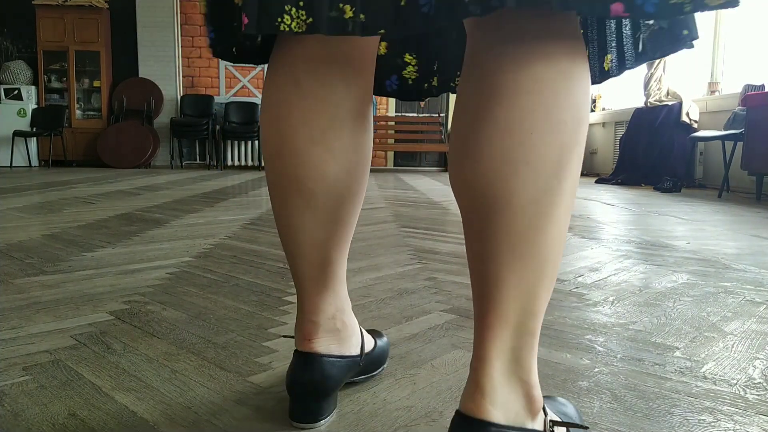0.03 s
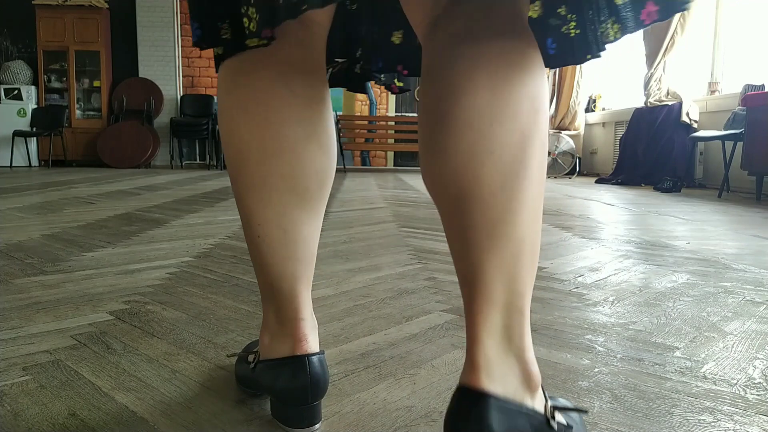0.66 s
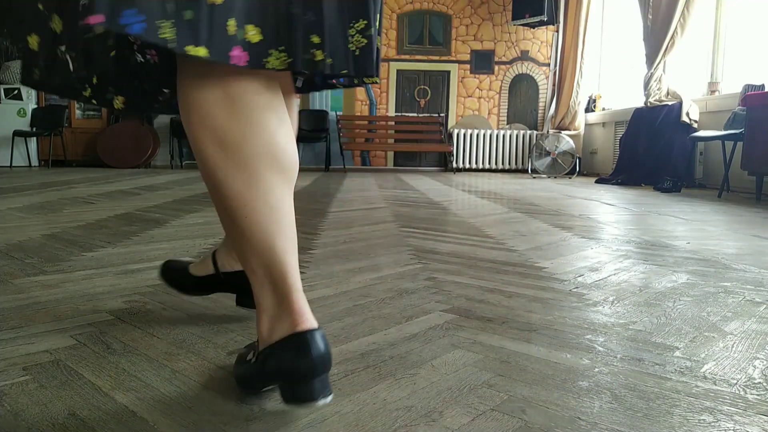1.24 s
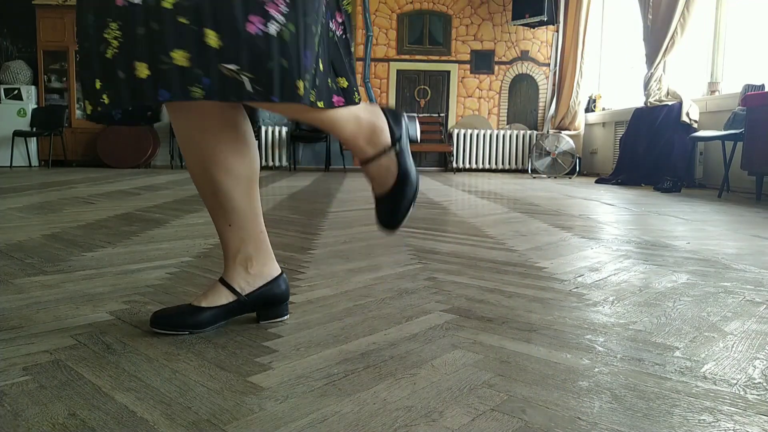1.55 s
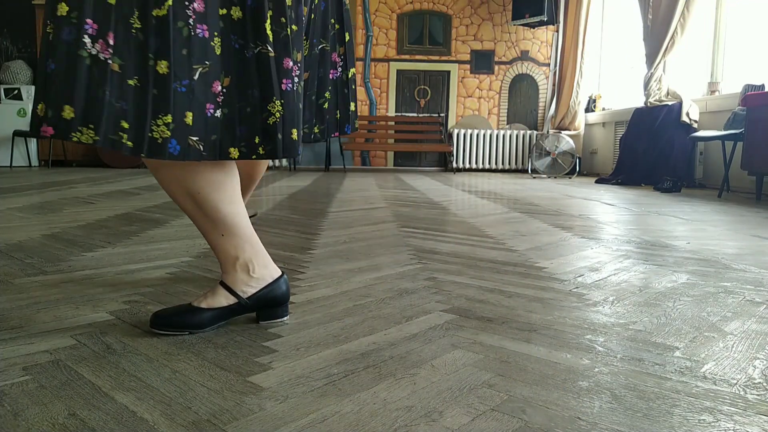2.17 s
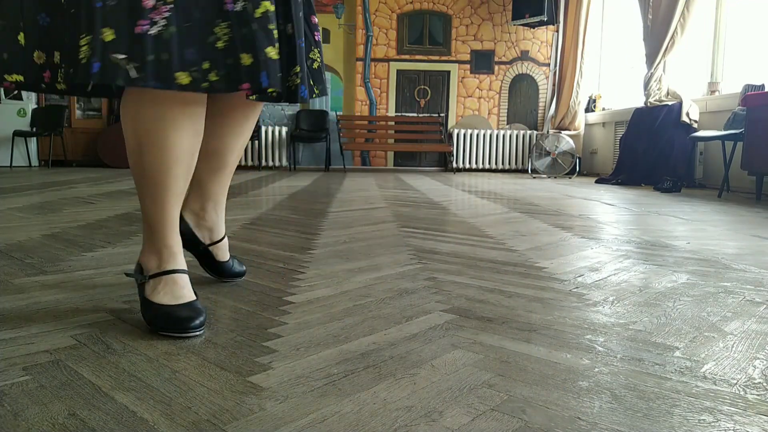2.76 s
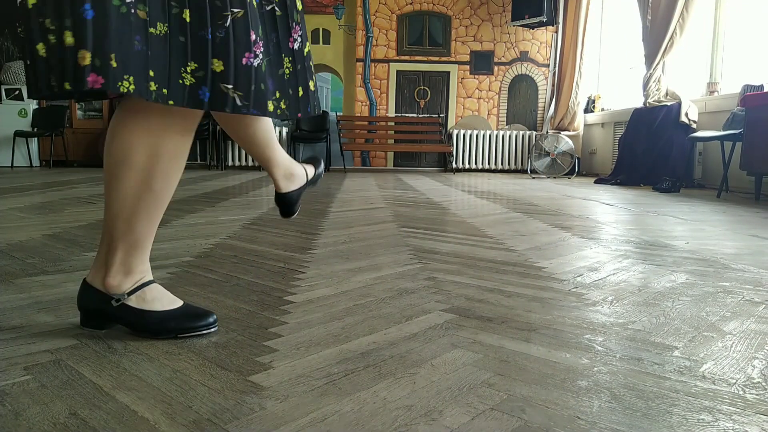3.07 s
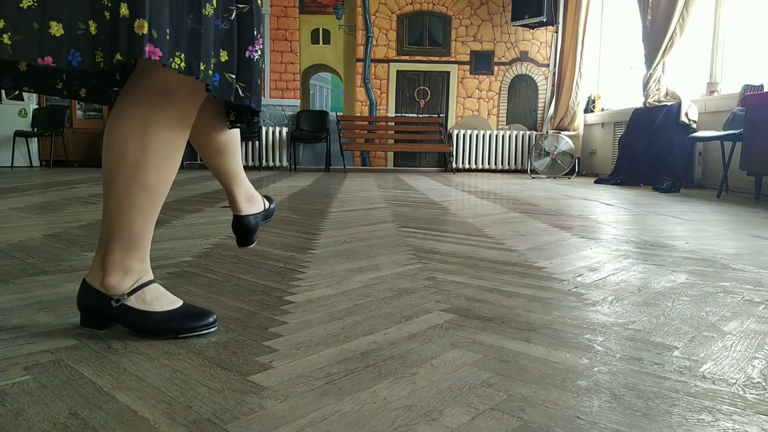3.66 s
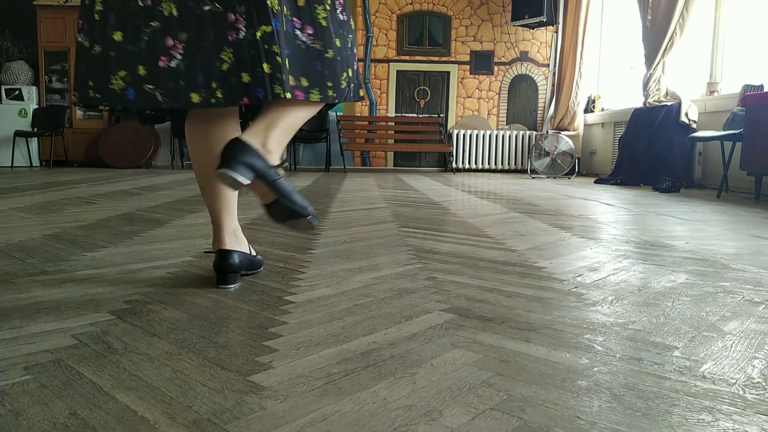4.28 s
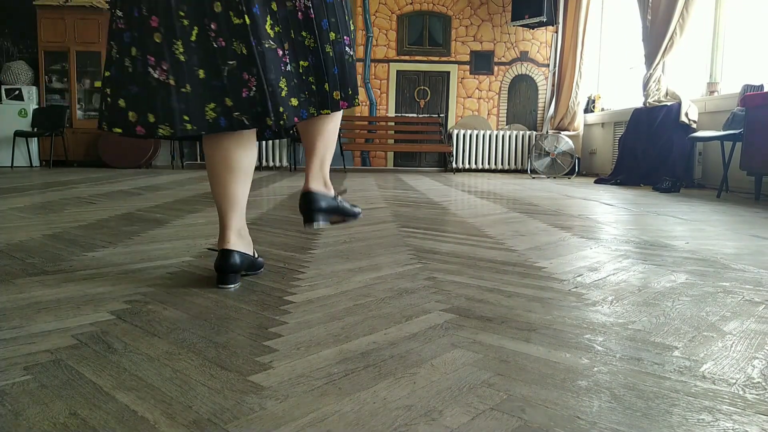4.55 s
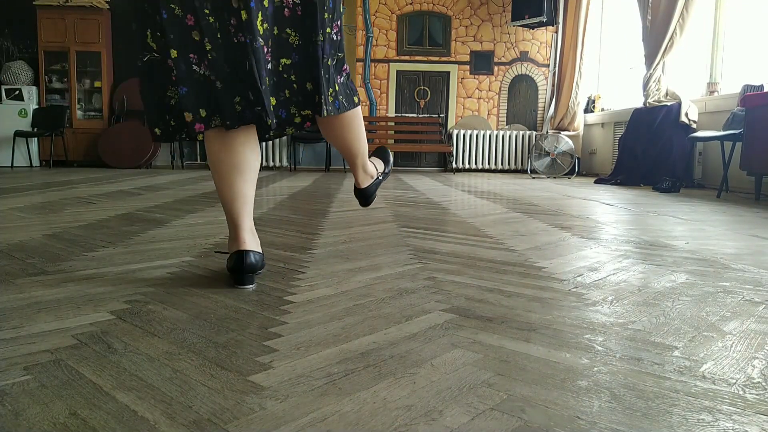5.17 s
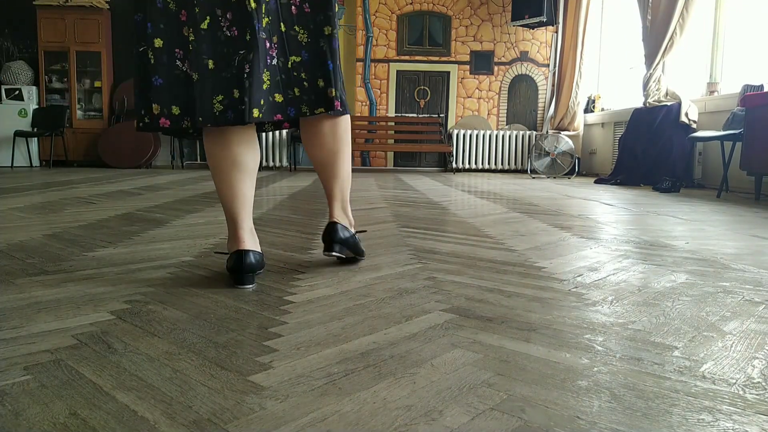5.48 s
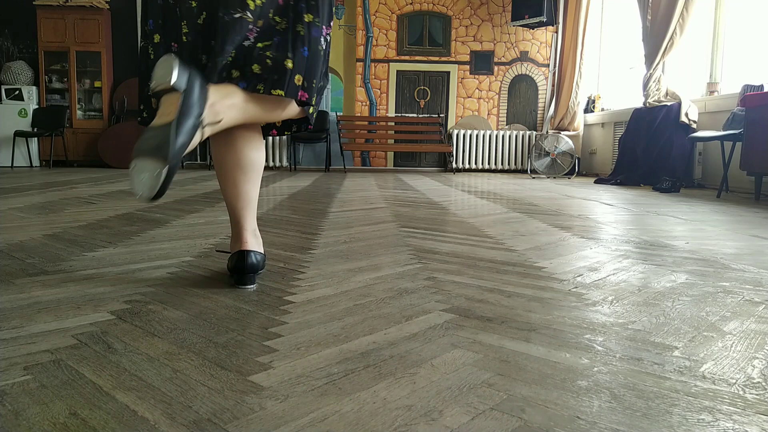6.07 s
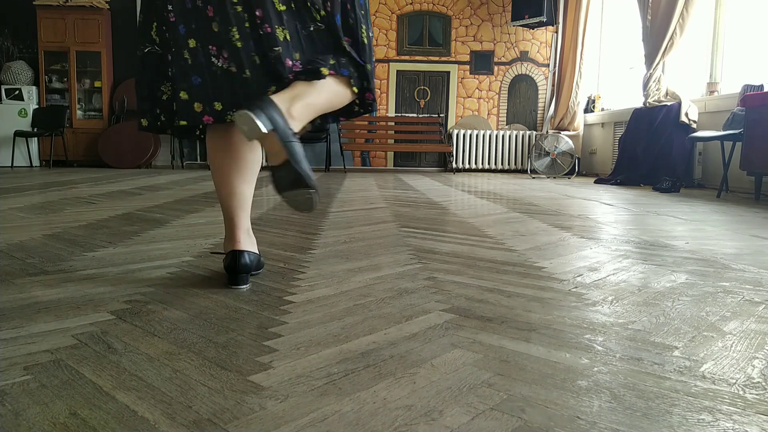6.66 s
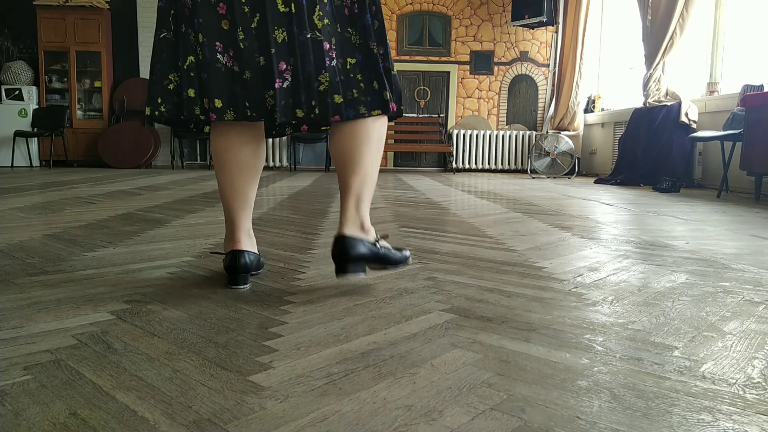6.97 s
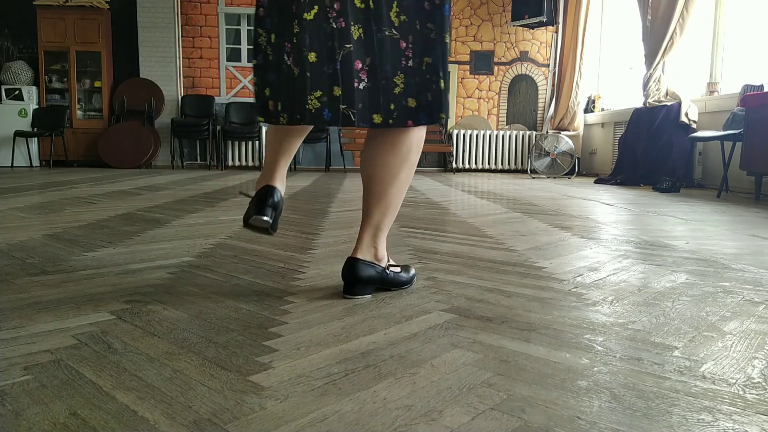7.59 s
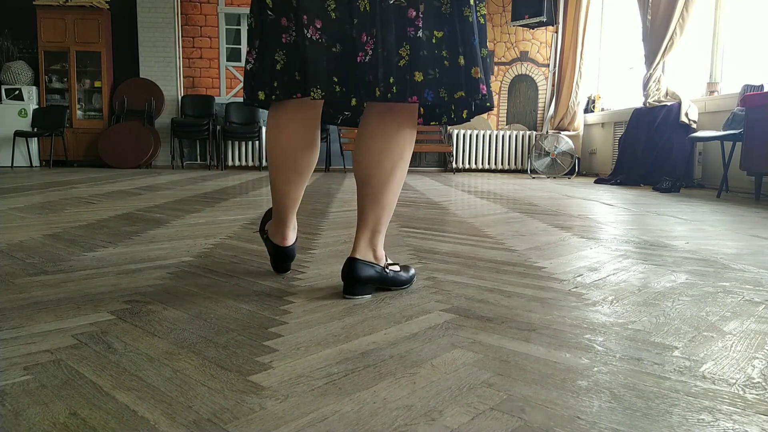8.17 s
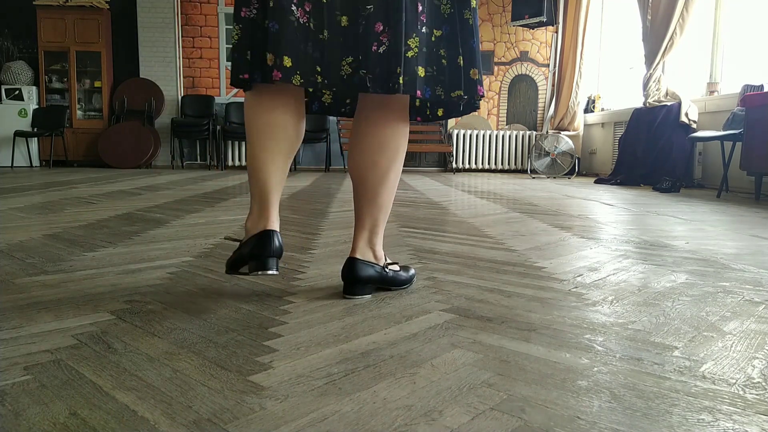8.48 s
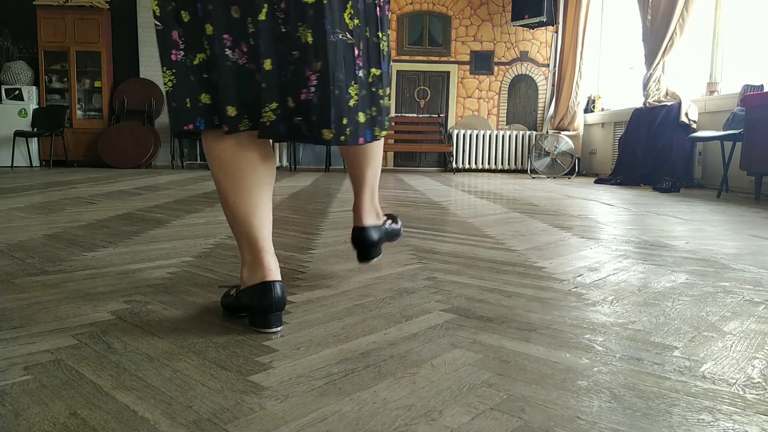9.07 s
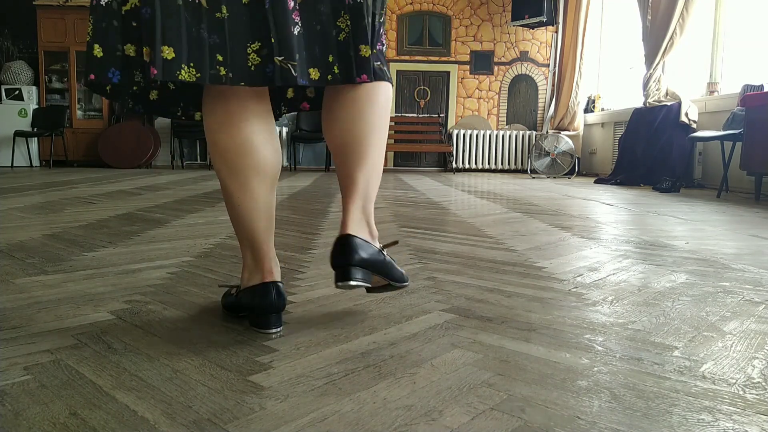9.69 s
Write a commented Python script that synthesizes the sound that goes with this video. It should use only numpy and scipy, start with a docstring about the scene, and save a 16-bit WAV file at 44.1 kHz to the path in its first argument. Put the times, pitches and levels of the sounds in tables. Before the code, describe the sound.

Tap shoes strike a wooden floor in a large echoing hall, five slow steps followed by steps at twice the pace.

```python
"""A tap dancer on the parquet of a large hall: five slow steps, then steps at twice the pace.
Metal plates crack, heel and sole knock, the sprung floor thuds; shoes tick and cloth swishes softly.
A pair of microphones 13 cm apart has the dancer ahead and to the right and a wall just behind it.
That wall, the ceiling and the hall answer over a distant motor's hum and the building's rumble and hiss.
The recorder's limiter holds down the cracks."""
import sys
import numpy as np
from scipy import signal
from scipy.fft import rfft, irfft, next_fast_len
from scipy.io import wavfile
from scipy.ndimage import uniform_filter1d, minimum_filter1d, map_coordinates

SR = 44100
rng = np.random.default_rng(int(sys.argv[2]) if len(sys.argv) > 2 else 0)


def waveform_to_disk(signal):
    """Save audio, clipped to [-1, 1], as 16-bit WAV at the path in sys.argv[1]."""
    frames = np.transpose(np.atleast_2d(signal))
    scaled = np.clip(frames, -1, 1) * 32767
    samples = np.round(scaled).astype(np.int16)
    wavfile.write(sys.argv[1], SR, samples)


N = 437913
SIZE = 65536  # samples for one contact and its reverberation
HZ = np.fft.rfftfreq(SIZE, 1 / SR) + 1e-3
T = np.arange(SIZE) / SR

# The distant motor. Each row: frequency in Hz, rms level in dB.
MOTOR_TONES = [(48.5, -53), (97, -72.5), (113, -62)]
# Room tone, low and high. Each row: frequency in Hz, relative spectral level in dB.
RUMBLE_SPECTRUM = [(15, -11), (38, -22.5), (50, 10), (63, 1.5), (88, -2.5), (130, -14), (160, -8),
                   (187, -2), (215, -6), (265, -23.5), (302, -13.5), (370, -32), (480, -38.5), (700, -76.5)]
HISS_SPECTRUM = [(300, -19.5), (450, -3.5), (750, -3), (1020, -3), (1600, -9.5), (2200, -9.5),
                 (5000, -15.5), (9500, -11), (15500, -20)]
# The hall's reverberation fading from an earlier step (two rows), then soft swishes of skirt and shoe.
# Each row: middle in seconds, half length in seconds, level in dB, centre in Hz.
SOFT_NOISES = [(0.015, 0.14, -60, 1790), (0.022, 0.079, -77, 4800), (.817, 0.018, -57.5, 1300),
               (1.383, 0.061, -57, 12200), (2.59, 0.18, -59, 12500), (2.93, 0.084, -71, 9100)]
# The shoes shifting. Each row: start in seconds, relative level in dB, wooden knock against the ring
# in dB, ring in Hz.
TICKS = [(.169, -45, -4, 11000), (.175, -30.5, -18, 2130), (.175, -32.5, -14, 5540), (.209, -48, -6, 1500),
         (.357, -50, -4, 8900), (.579, -57, 10, 900), (.590, -50.5, 5, 1390), (.662, -43.5, 5.5, 2410),
         (.684, -51, 0.5, 6000), (.776, -53, -11.5, 11000), (.786, -46, -14, 10000), (1.276, -56, -6, 1930),
         (1.394, -57, 5, 1500), (7.532, -28, -9.5, 3740)]
# Shoe meets floor. Each row: start in seconds, blow on the wood in dB, heel share (0 toe, 1 heel),
# floor boom in dB, blow on the plate in dB, edge share (0 flat, 1 on edge), plate pitch ratio;
# first resonance in Hz and signed dB added, second resonance in Hz and signed dB subtracted, board in Hz
# and its gain in dB, sole overtone in Hz and its gain in dB; bearing in degrees to the right,
# treble thrown at the microphones in dB, sound thrown at the ceiling in dB.
TAPS = [(1.447, 26.5, 0.47, 0, 16.5, 0.77, 0.72, 5640, 1.5, 2750, 3, 330, 2, 2250, -1, 22, 5.5, -0.5),
        (2.257, 30.5, 0.59, 11, 15, 0.3, 0.71, 597, 4, 970, 3.5, 315, -5, 2870, -2, 24, -4, -6.5),
        (3.086, 22.5, 0.11, 25.5, 18, 0.34, 1.13, 2150, 0.5, 1070, 8.5, 192, 2.5, 1587, 1.5, 37, 2, -3),
        (3.926, 25.5, 0.26, 8.5, 0.5, 1, 1.17, 8840, -11, 2170, -2, 122, -3, 1350, 4.5, 19.5, -4, -4),
        (3.931, 9.5, 0.89, 15, 17.5, 0.22, 1.58, 8640, 9.5, 1283, 7, 128, -1, 6700, 6, 22.5, 0, 2),
        (4.7161, 30, 0.35, 0, 17.5, .02, 0.86, 517, 7.5, 370, 4.5, 159, 5.5, 8450, 0.5, 11, 3.5, -3.5),
        (5.1162, 17, 0.21, 32, 13, 0.6, 0.71, 7760, 7, 4530, 9, 563, 0, 1960, -2, 20.7, 2.5, 4),
        (5.514, 24, 0.58, 17, 22.5, 0.7, .5, 4770, 9.5, 1330, 6.5, 122, -8, 1790, -2, 3.9, 0.5, -1.5),
        (5.881, 21, 0.19, 25.5, 14, 0.47, 1.2, 3700, 2, 860, 11.5, 195, -6, 1950, -3.5, 18, 4, 2),
        (6.3028, 24, 0.47, 24, 5, 0.45, 0.95, 830, 3, 3760, -1, 450, 3.5, 2165, 6.5, 13.6, 6, -1),
        (6.679, 3, 0.96, 15, 0.5, 0.93, 0.86, 6840, -5, 1680, 3.5, 389, 7, 2900, 4, 21, 4, -1),
        (6.6864, 12, 0, -12, 4, 0.42, 0.56, 2970, 3, 1690, 5.5, 382, 5, 6730, 5, 20, 2, -2),
        (7.1157, 24, 0.086, 16, 15.5, 0.72, 1.19, 5160, 6, 3220, -1, 119, 9.5, 2670, 4.5, 5.7, 1.5, 5),
        (7.1257, 19, 0.95, 20, 13, 1, 0.83, 1890, 1, 3440, 4, 684, -3.5, 7900, -11, 3.3, -3.5, -5),
        (7.9531, 28, 0.34, 22.5, 23, 0.054, 1.14, 7030, 6.5, 4340, 12, 124.5, 7, 1510, 0, 13.6, -1, -4),
        (8.3884, 21, 0.77, 21, 20, 0.33, 1.17, 3580, -5, 12600, 14, 470, -10, 1410, -6, 16, 2, 0.5),
        (8.7964, 27, 0.54, 15, 23.5, 0.36, 0.84, 4340, -1.5, 2800, 7.5, 122, -3.5, 2200, 3.5, 18, 1.5, 0),
        (9.217, 26.5, 0.33, 28, 15, 0.25, 0.86, 8300, 6.5, 1740, 6.5, 354, 3, 13200, 10, 1.3, 0.5, -2),
        (9.63, 24.5, 0.23, 2, 22, .35, 1.29, 3830, 0, 1620, 4, 170, -7, 1180, 5.5, 4, 3.5, 1.5)]
# Joist, board, heel and sole: a heel knocks where a toe only thuds. Each row: resonance in Hz,
# sharpness Q, level under the toe in dB, gain under the heel in dB.
WOOD_MODES = [(128, 2.2, -7, 0.5), (229, 1.11, 0, -4.5), (625, 1.01, -11.5, 15), (1393, 2.1, -21, 20)]
# The metal plate, from clack to click. Each row: resonance in Hz, sharpness Q, level landing flat in dB,
# gain on edge in dB, share of the pitch change that it follows.
PLATE_MODES = [(2226, 1.56, -6, 3.5, 0), (3205, 2.28, 0.9, -11.5, 0.43), (6360, 1.13, -19, 24, 1),
               (9740, 2.4, -18, 12.5, 0.27), (13000, 2.07, -27.5, 10.5, 0)]
# The plates' thin steel overtones. Each row: frequency in Hz, average gain in dB.
STEEL_OVERTONES = [(2630, 1.5), (3900, 2.5), (4620, 2), (5200, 1), (6560, -1.5), (7480, 0), (9690, 0.5),
                   (11540, 1.5)]
# Early echoes off ceiling and walls. Each row: delay in seconds, relative level in dB, treble corner in Hz.
ECHOES = [(0.0142, -4.5, 2800), (0.0324, -16.5, 1500), (0.0515, -17, 1400)]
# The hall's decay. Each row: frequency in Hz, seconds to fall by 60 dB.
HALL_DECAY = [(60, 0.79), (220, 1.21), (700, 1.028), (2200, 1.135), (5300, 0.95), (9000, 0.7),
              (14000, 0.43)]
# The tone of its reverberation. Each row: frequency in Hz, gain in dB.
HALL_COLOUR = [(50, -8), (85, 7.5), (120, -1), (250, 1.5), (340, -2), (470, -2.5), (900, 1), (1500, -0.5),
               (2800, -1), (5000, 0.5), (10500, 3), (12500, 1.5), (15000, -7.5)]
# Diffuse sound at the pair. Each row: frequency in Hz, left-right correlation.
MIC_LIKENESS = [(60, 0.99), (150, 0.99), (260, 0.83), (600, 0.76), (1200, 0.078), (3000, 0.08)]

BOOM_HZ, BOOM_Q = 55.7, 1.1  # the sprung floor
CLACK_HZ, CLACK_Q, CLACK_DB = 2400, 1.5, 1.9  # the ring that the plate beams forward
MIC_SPACING_M, SOUND_M_PER_S = 0.13, 343


def amp(db):
    """Decibels to gain."""
    return 10 ** (np.asarray(db) / 20)


def unit(x):
    """Scale to rms 1."""
    return x / np.sqrt(np.mean(x ** 2))


def along(points, hz):
    """Read (Hz, value) points on a log axis."""
    freqs, values = np.transpose(points)
    return np.interp(np.log(hz + 1), np.log(freqs), values)


def filtered(x, gain):
    """Apply a gain that depends on frequency."""
    size = next_fast_len(N + SR // 2)
    return irfft(rfft(x, size) * gain(np.fft.rfftfreq(size, 1 / SR)), size)[..., :N]


def hump(hz, centre, q):
    """Gain of a resonance with steep skirts."""
    hz = hz + 1
    return 1 / (1 + (q * (hz / centre - centre / hz)) ** 2)


def highpass(corner_hz):
    """Gain that rises from 0 in the bass to 1 in the treble."""
    return HZ ** 2 / (HZ ** 2 + corner_hz ** 2)


def causal(gain):
    """The response with this gain that starts sharply and then rings out."""
    cepstrum = irfft(np.log(np.maximum(gain, 1e-6)))
    cepstrum[1:SIZE // 2] *= 2
    cepstrum[SIZE // 2 + 1:] = 0
    return np.exp(rfft(cepstrum))


def delay(s):
    """Response of a delay."""
    return np.exp(-2j * np.pi * HZ * s)


def motor_hum(drift_hz):
    """A motor far off in the building drones, slightly unsteady, alike in both microphones."""
    t = np.arange(N) / SR
    out = np.zeros(N)
    for hz, db in MOTOR_TONES:
        drift = drift_hz * map_coordinates(rng.standard_normal(24), [2 * t])
        out += np.sqrt(2) * amp(db) * np.sin(2 * np.pi * np.cumsum(hz + drift) / SR)
    return out


def diffuse(pair, hz):
    """Two unrelated spectra become a diffuse field at the microphones, alike in the bass only."""
    turn = np.arccos(np.clip(along(MIC_LIKENESS, hz), -1, 1)) / 2
    mid, side = pair[0] * np.cos(turn), pair[1] * np.sin(turn)
    return np.array([mid + side, mid - side])


def room_tone(spectrum, db):
    """The building's steady noise, arriving from all sides."""
    size = next_fast_len(N)
    hz = np.fft.rfftfreq(size, 1 / SR)
    field = diffuse(rfft(rng.standard_normal((2, size))), hz) * amp(along(spectrum, hz))
    return amp(db) * unit(irfft(field, size)[:, :N])


def hall_fade_and_swishes(grit_db, grit_hz):
    """Soft, grainy swells of noise: the hall fading from an earlier step, then skirt and shoe swishing."""
    t = np.arange(N) / SR
    out = np.zeros((2, N))
    for middle_s, half_s, db, centre_hz in SOFT_NOISES:
        noise = filtered(rng.standard_normal((2, N)), lambda hz: hump(hz, centre_hz, q=0.29))
        grit = amp(grit_db * np.interp(t * grit_hz, np.arange(N), rng.standard_normal(N)))
        swell = np.exp(-((t - middle_s) / half_s) ** 2)
        out += amp(db) * swell * unit(noise * grit)
    return out


def ticks(level_db):
    """A plate or a buckle ticks as the weight shifts."""
    out = np.zeros((2, N))
    for start_s, db, knock_db, ring_hz in TICKS:
        body = causal(amp(knock_db) * hump(HZ, 640, q=0.537) + hump(HZ, ring_hz, q=0.81))
        path = to_microphones(lag_s=0.0001, facing_db=-1.0, direct_db=7.5, echo_db=-2.0, hall_db=-0.5,
                              back_s=0.00139, back_share=0.96, bass_hz=200)
        add(out, start_s, irfft(amp(db + level_db) * body * chatter(t60=0.016, channels=1) * path))
    return out


def add(track, start_s, sound):
    """Mix a sound into the track, up to where it has died away."""
    start = round(start_s * SR)
    length = min(N - start, SIZE - SIZE // 8)
    track[:, start:start + length] += sound[:, :length]


def chatter(t60, channels):
    """Spectrum of a short dying burst of noise, energy 1 per channel."""
    burst = rng.standard_normal((channels, SIZE)) * amp(-60 * np.minimum(T / t60, 5))
    return rfft(burst / np.linalg.norm(burst, axis=1, keepdims=True))


def roughened(share, corner_hz, t60, channels):
    """A clean impulse whose treble is partly scattered into chatter."""
    scattered = share * highpass(corner_hz)
    return np.sqrt(1 - scattered) + np.sqrt(scattered) * chatter(t60, channels)


def to_microphones(lag_s, facing_db, direct_db, echo_db, hall_db, back_s, back_share, bass_hz):
    """From shoe to pair: straight, off the wall close behind, off ceiling and walls, through the hall."""
    pair = np.array([delay(lag_s), delay(0)])  # the left microphone hears it late
    back_wall = 1 + back_share * delay(back_s) / (1 + 1j * HZ / 6000)
    straight = plate_beam(facing_db) * roughened(share=0.29, corner_hz=2500, t60=0.015, channels=2)
    early = amp(direct_db) * straight + amp(echo_db) * early_echoes(scatter_db=1.5)
    # the floor's boom spreads over the whole hall and hardly shows in the first crack
    bass_cut = causal(highpass(bass_hz))
    return pair * bass_cut * back_wall * early + amp(hall_db) * hall_tail(build_s=0.021)


def plate_beam(treble_db):
    """The plates throw their clack at the microphones, with more or less treble."""
    return causal(amp(treble_db * highpass(1800) + CLACK_DB * hump(HZ, CLACK_HZ, CLACK_Q)))


def early_echoes(scatter_db):
    """Ceiling and walls send back dulled, scattered echoes, a little different at every contact."""
    echoes = 0
    for delay_s, db, dull_hz in ECHOES:
        gain = amp(db + scatter_db * rng.standard_normal())
        arrival = delay(delay_s * (1 + 0.011 * rng.standard_normal()))
        echoes += gain * arrival / (1 + 1j * HZ / dull_hz)
    echoes *= smear(spread_s=0.0011, step_hz=414)
    return echoes * roughened(share=0.92, corner_hz=1500, t60=0.013, channels=2)


def smear(spread_s, step_hz):
    """An uneven ceiling or a rocking plate makes each part of the spectrum arrive slightly late."""
    lateness = map_coordinates(rng.random(512), [HZ / step_hz], order=1, mode="mirror")
    late_s = spread_s * lateness * HZ / (HZ + 500)
    return np.exp(-2j * np.pi * np.cumsum(late_s) * SR / SIZE)


def hall_tail(build_s):
    """The hall's reverberation builds up, then each frequency dies at its own speed."""
    hz, t, noise = signal.stft(rng.standard_normal((2, SIZE)), SR, nperseg=256)
    decay = amp(-60 * t / along(HALL_DECAY, hz)[:, None])
    tail = signal.istft(noise * decay, SR, nperseg=256)[1][:, :SIZE]
    tail *= (1 - np.exp(-(T / build_s) ** 2)) / np.sqrt(SR * 0.065)
    return diffuse(rfft(tail), HZ) * amp(along(HALL_COLOUR, HZ))


def taps():
    """Each contact rings floor, shoe and plate; the plate rocks and chatters briefly on the wood."""
    out = np.zeros((2, N))
    for start_s, wood_db, heel, boom_db, plate_db, edge, pitch, *rings, degrees, facing_db, up_db in TAPS:
        modes = shoe_on_floor(wood_db, heel, boom_db, plate_db, edge, pitch)
        body = causal(modes * struck_spot(*rings) * steel_shimmer())
        rocking = smear(spread_s=0.0004, step_hz=750)
        blow = body * rocking * roughened(share=0.095, corner_hz=2470, t60=0.045, channels=1)
        lag_s = MIC_SPACING_M * np.sin(np.radians(degrees)) / SOUND_M_PER_S
        path = to_microphones(lag_s, facing_db, direct_db=-1.6, echo_db=-4.0 + up_db, hall_db=-1.5,
                              back_s=0.001441, back_share=0.56, bass_hz=117)
        add(out, start_s, irfft(blow * path))
    return out


def shoe_on_floor(wood_db, heel, boom_db, plate_db, edge, pitch):
    """More heel brings out the knock, more edge the plate's bright ring; pitch follows where it is hit."""
    modes = [(BOOM_HZ, BOOM_Q, boom_db)]
    modes += [(hz, q, wood_db + db + heel * heel_db) for hz, q, db, heel_db in WOOD_MODES]
    modes += [(hz * pitch ** follows, q, plate_db + db + edge * edge_db)
              for hz, q, db, edge_db, follows in PLATE_MODES]
    return np.sqrt(sum((amp(db) * hump(HZ, hz, q)) ** 2 for hz, q, db in modes))


def struck_spot(first_hz, first_db, second_hz, second_db, board_hz, board_db, sole_hz, sole_db):
    """Two resonances, each raised or lowered, colour each tap; board and sole ring or are damped."""
    return amp(first_db * hump(HZ, first_hz, q=4.4) - second_db * hump(HZ, second_hz, q=4.1)
               + board_db * hump(HZ, board_hz, q=3.5) + sole_db * hump(HZ, sole_hz, q=6))


def steel_shimmer():
    """The steel's thin overtones, a little different at every contact."""
    return amp(sum(db * rng.uniform(0.5, 1.5) * hump(HZ, hz, q=140) for hz, db in STEEL_OVERTONES))


def scene():
    """The dancer and the hall as they reach the microphones."""
    dancer = taps() + ticks(level_db=12.0) + hall_fade_and_swishes(grit_db=2.5, grit_hz=456)
    motor = motor_hum(drift_hz=0.29)
    return dancer + motor + room_tone(RUMBLE_SPECTRUM, db=-51) + room_tone(HISS_SPECTRUM, db=-70)


def saturated(x, top_db):
    """The recorder rounds off the tallest spikes."""
    return x / (1 + (x / amp(top_db)) ** 4) ** (1 / 4)


def limiter(x, ceiling_db, release_db_per_s):
    """The gain drops just ahead of each peak and recovers at a steady rate."""
    peak_db = 20 * np.log10(np.abs(x).max(axis=0) + 1e-9)
    over_db = np.maximum(peak_db - ceiling_db, 0)
    recovery = release_db_per_s * np.arange(N) / SR
    gain_db = recovery - np.maximum.accumulate(over_db + recovery)
    ahead_db = minimum_filter1d(gain_db, size=25)
    return x * amp(uniform_filter1d(ahead_db, size=25))


def record(dry):
    """The recorder rounds and limits the cracks and cuts off steeply above 15.7 kHz."""
    held = limiter(saturated(dry, top_db=-0.5), ceiling_db=-2.6, release_db_per_s=891.0)
    return filtered(held, lambda hz: 1 / (1 + (hz / 15700) ** 100))


dry = scene()
out = record(dry)
waveform_to_disk(out)
```